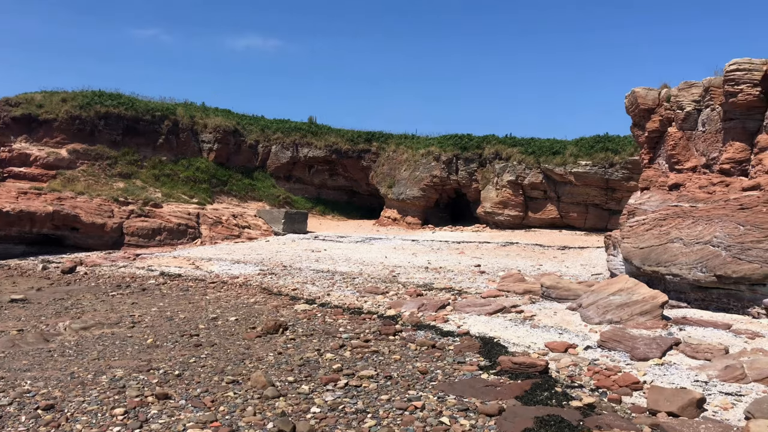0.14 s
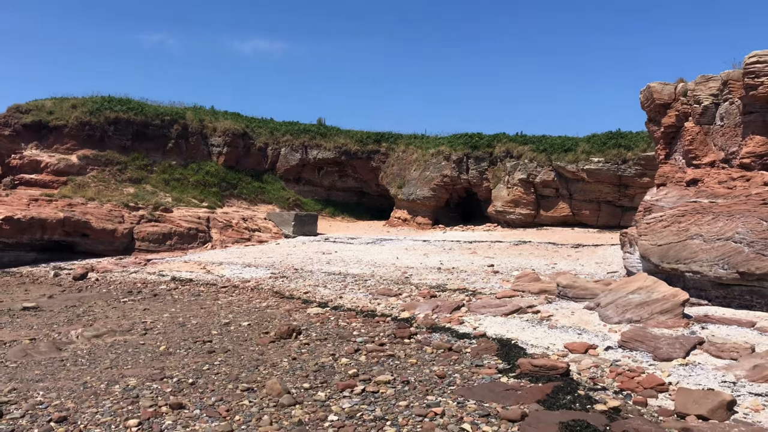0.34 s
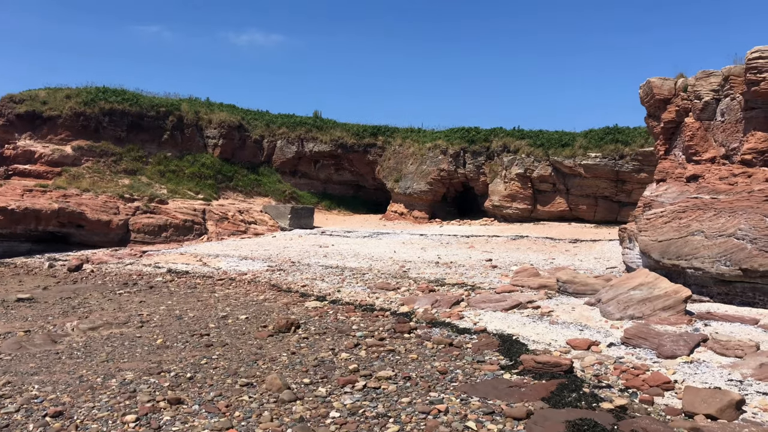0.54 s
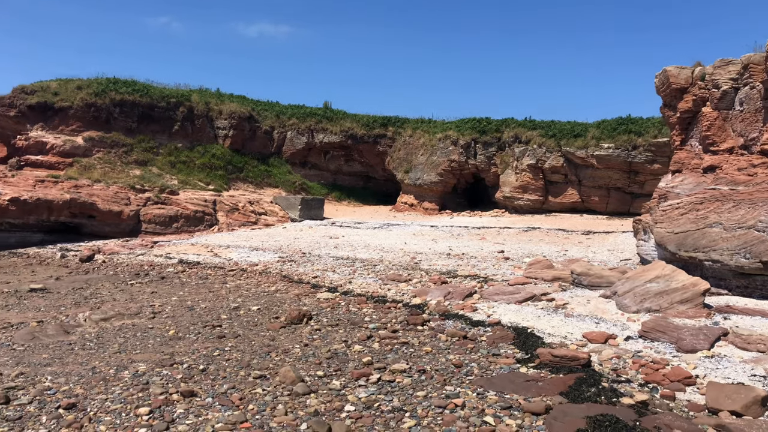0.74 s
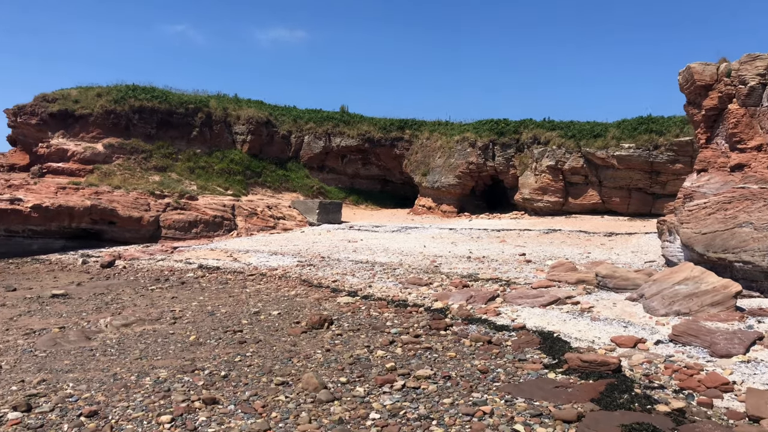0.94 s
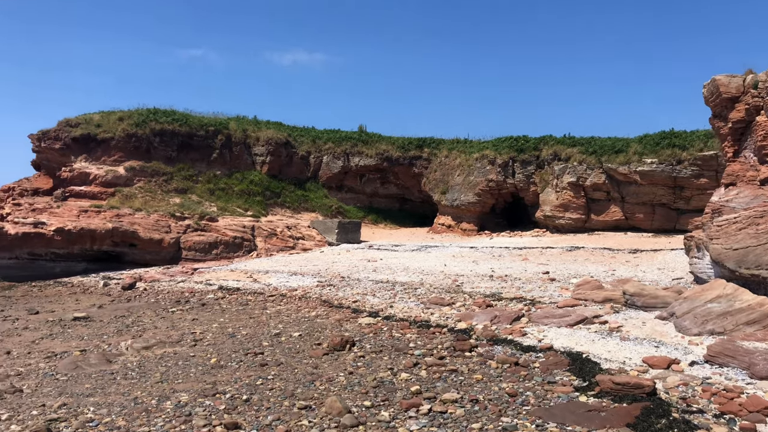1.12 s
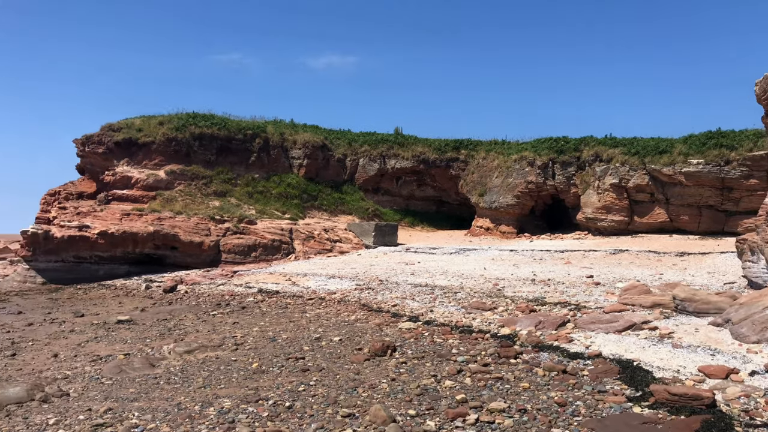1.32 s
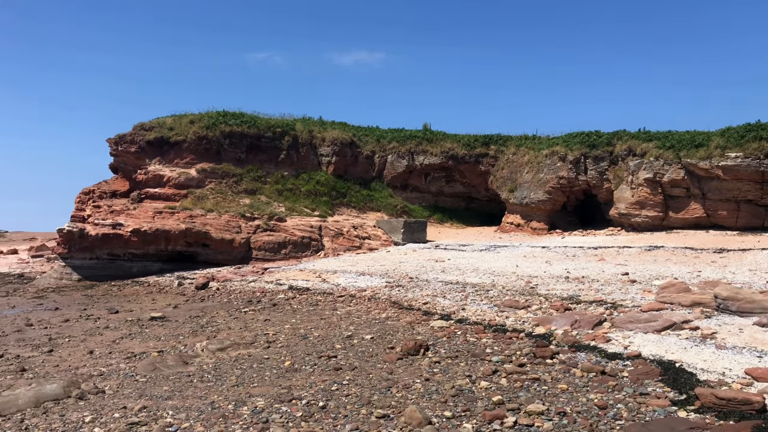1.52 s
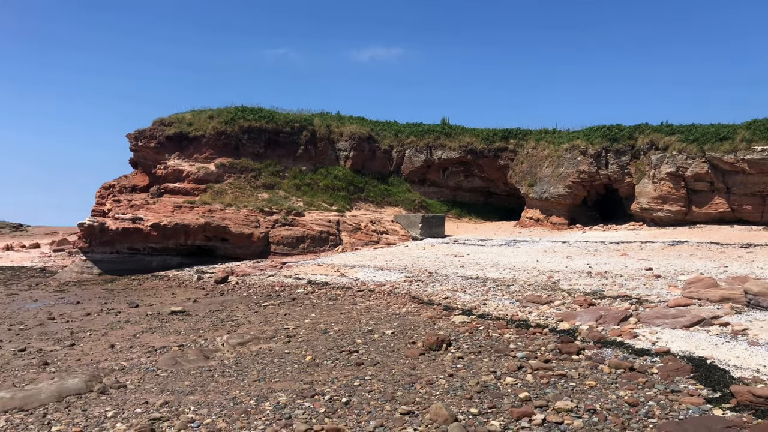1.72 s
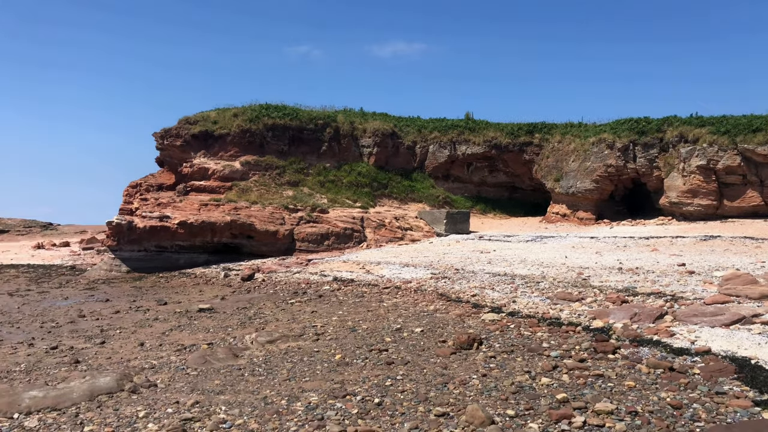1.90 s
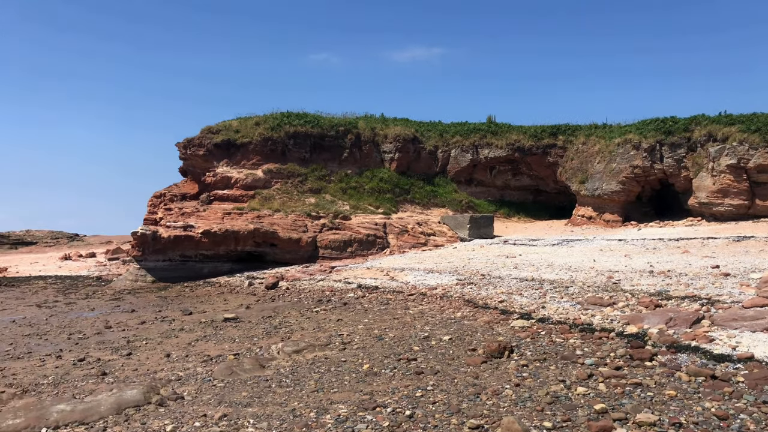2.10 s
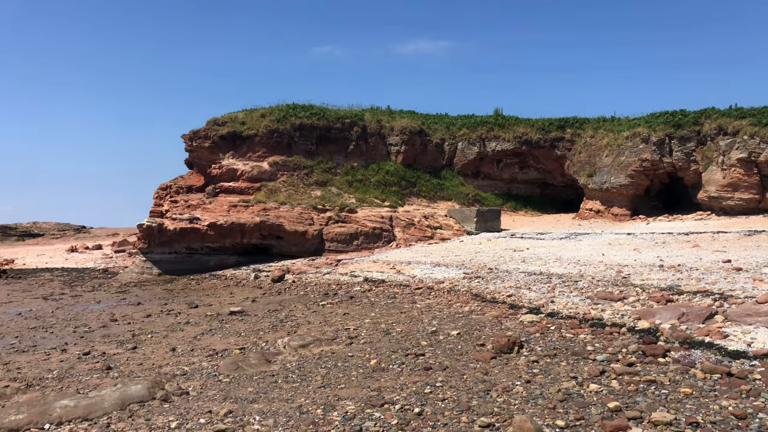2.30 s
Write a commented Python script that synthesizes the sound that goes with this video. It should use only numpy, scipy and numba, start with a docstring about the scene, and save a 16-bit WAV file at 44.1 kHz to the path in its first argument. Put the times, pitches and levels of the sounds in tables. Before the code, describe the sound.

Footsteps crunch over loose pebbles on an open shore. Stones grind from the start; dull thumps cluster at 0.2-0.3 s and 0.5 s, with a small clink near 0.4 s. A bright clink at 1.1 s leads into dense clacking until 1.4 s. A hard thump and loud crunch hit at 1.7 s, then grit settles softly to the end. Breeze rumbles on the handheld microphone over faint shore hiss.

```python
"""Someone walks over a pebble shore in the open air, microphone in hand; the sound is mono.
Throughout, shifts of weight crunch stones, gravel and grit (dense damped sines in three swelling bands),
over a breeze rumbling on the microphone and a faint hiss from the shore (both coloured noise).
From 0.2 s dull thumps (sagging sines) and dry clacks (noise bursts) join in, the hardest thump near 0.3 s.
Pebbles clink (decaying modes) near 0.4, 1.1 and 1.7 s, the last with a hard thump and a loud crunch."""
import sys
import numpy as np
from scipy import signal
from scipy.fft import rfft, irfft
from scipy.io import wavfile
from scipy.ndimage import uniform_filter1d
from numba import njit

SR = 44100
rng = np.random.default_rng(int(sys.argv[2]) if len(sys.argv) > 2 else 0)


def bounce(signal):
    """Save signal as a 16-bit WAV file at the path given by the first command-line argument."""
    frames = np.transpose(np.atleast_2d(signal))
    limited = np.clip(frames, -1, 1)
    pcm = np.round(limited * 32767).astype(np.int16)
    wavfile.write(sys.argv[1], SR, pcm)


N = 103635
T = np.arange(N) / SR
FREQS = np.maximum(np.fft.rfftfreq(N, 1 / SR), 1)
TOP_HZ = 14400  # highest contact pitch, and the recorder's upper limit

# spectrum of crushed stone: (frequency [Hz], gain [dB])
STONE_COLOUR = [(250, 19), (600, 12), (1000, 8), (1330, 8.5), (1900, 6.5), (2700, -0.5), (3800, 0),
                (5500, -8.5), (7500, -24.5), (9300, -31), (10800, -36.5), (14500, -35.5)]


def undb(db):
    """Decibels to gain."""
    return 10 ** (np.asarray(db) / 20)


def unit(x):
    """Scale to rms 1."""
    return x / np.sqrt(np.mean(x ** 2))


def colour(x, points):
    """Shape a spectrum by (Hz, dB) points, interpolated over log frequency; rms 1."""
    hz, db = np.array(points).T
    gain = undb(np.interp(np.log(FREQS), np.log(hz), db))
    return unit(irfft(rfft(x) * gain, N))


def add(out, start_s, x):
    """Mix a short sound in at its time."""
    i = max(int(start_s * SR), 0)
    out[i:i + len(x)] += x[:max(N - i, 0)]


def crunch():
    """Each shift of weight swells and dies away, moving stones, gravel and grit in its own proportions."""
    # shifts of weight: (peak time [s], rise [s], decay [s], stones [dB], gravel [dB], grit [dB])
    shifts = [(.015, 0.011, 0.16, -64.5, -66.5, -66), (.128, 0.016, 0.05, -55.5, -61, -85),
              (.158, 0.033, 0.067, -53.5, -59, -59), (.28, 0.11, 0.58, -61.5, -66.5, -68),
              (0.41, 0.0075, 0.012, -48.5, -67, -63), (.65, 0.071, 0.087, -61.5, -78, -71),
              (0.778, 0.012, 0.046, -62.5, -65.5, -67), (0.994, 0.0033, 0.097, -56, -59, -63.5),
              (1.119, 0.035, 0.13, -54.5, -57.5, -60), (1.12, 0.01, 0.0037, -69, -51.5, -56),
              (1.241, 0.026, 0.036, -49, -55.5, -62.5), (1.336, 0.023, 0.027, -52, -59, -86),
              (1.383, 0.0047, 0.013, -52.5, -58, -61), (1.45, 0.067, 0.17, -60.5, -65.5, -73.5),
              (1.582, 0.011, 0.058, -57.5, -67.5, -69.5), (1.694, 0.0032, 0.029, -44, -55, -54.5),
              (1.716, 0.013, 0.014, -48, -54.5, -54), (1.84, 0.14, 0.33, -59.5, -69.5, -72.5),
              (1.97, 0.16, 0.27, -69, -64, -72), (2.085, 0.026, 0.035, -62.5, -69, -62),
              (2.137, 0.047, 0.017, -60, -59, -86.5)]
    stones_top_hz, gravel_top_hz = 2210, 6790
    loose_db = -10  # ringing pebbles against dead contacts
    dead = contacts(per_s=4000, cycles=1.24, spread_db=0.5, top_hz=TOP_HZ, count=4)
    loose = contacts(per_s=1100, cycles=15, spread_db=2.5, top_hz=7500, count=2)
    stream = bed(dead + undb(loose_db) * loose)
    bands = [(stones_top_hz, "low"), ([stones_top_hz, gravel_top_hz], "band"), (gravel_top_hz, "high")]
    out = 0
    for k, (edges, kind) in enumerate(bands):
        band_filter = signal.butter(4, edges, kind, fs=SR, output="sos")
        grains = signal.sosfiltfilt(band_filter, stream)
        grains = grains / np.sqrt(uniform_filter1d(grains ** 2, size=1500))  # even level over 34 ms
        power = 0
        for peak_s, rise_s, decay_s, *db in shifts:
            before_s, after_s = np.minimum(T - peak_s, 0), np.maximum(T - peak_s, 0)
            swell = np.exp(-(before_s / rise_s) ** 2 / 2 - after_s / decay_s)
            power = power + (undb(db[k]) * swell) ** 2
        out = out + grains * np.sqrt(power)
    return out


def contacts(per_s, cycles, spread_db, top_hz, count):
    """A stream of tiny stone contacts, each ringing at a few (count) pitches of its own."""
    size = per_s * N // SR
    starts = np.repeat(rng.uniform(0, N, size), count)  # samples
    excess_db = spread_db * np.minimum(rng.exponential(size=size), 4)
    strength = np.repeat(undb(excess_db), count)
    hz = 400 * (top_hz / 400) ** rng.random(size * count)
    sizes = strength * hz ** 1.5 * rng.uniform(-1, 1, size * count)
    return colour(rings(starts, hz, sizes, float(cycles)), STONE_COLOUR)


@njit
def rings(starts, hz, sizes, cycles):
    """A damped sine for each contact, falling by 1 / e in the given cycles."""
    out = np.zeros(N)
    for k in range(len(hz)):
        z = sizes[k] + 0j
        step = np.exp((2j * np.pi - 1 / cycles) * hz[k] / SR)
        stop = min(N, int(starts[k] + 6 * cycles * SR / hz[k]))
        for i in range(int(starts[k]), stop):
            z *= step
            out[i] += z.imag
    return out


def bed(x):
    """The heap of stones favours some pitches and swallows others: random gain over frequency."""
    ripple_db, spacing_hz = 2.5, 69.72
    ripple = np.interp(FREQS / spacing_hz, np.arange(1024), rng.standard_normal(1024))
    return irfft(rfft(x) * undb(ripple_db * ripple), N)


def jerks():
    """Stones stick and give way: a stepped gain makes uneven spurts a few milliseconds long."""
    jerks_per_s, jerk_db = 220, 2.0
    spurt = np.cumsum(rng.random(N) < jerks_per_s / SR)  # index of the current spurt
    strength = undb(jerk_db * np.clip(rng.standard_normal(N), -2, 2))
    return unit(uniform_filter1d(strength[spurt], size=32))


def thumps():
    """Soft, heavily damped blows: a few cycles that sag in pitch, roughened by scuffing."""
    # dull thumps: (time [s], starting pitch [Hz], level [dB])
    blows = [(0.2265, 390, -28.5), (0.2418, 923, -32.5), (0.2443, 272, -31), (0.247, 905, -24),
             (0.2557, 830, -25.5), (0.3077, 820, -17.5), (0.5112, 365, -28.5), (0.5213, 615, -21),
             (0.524, 239, -25.5), (.609, 710, -35), (.635, 435, -34), (.654, 590, -31.5), (.680, 422, -35),
             (.714, 380, -41.5), (0.797, 453, -36), (0.81, 360, -33), (0.823, 943, -37), (.830, 586, -31.5),
             (0.833, 201, -34), (.994, 765, -37), (1.008, 460, -33), (1.0174, 174, -31.5),
             (1.042, 750, -38.5), (1.125, 760, -32.5), (1.258, 605, -37.5), (1.31, 560, -36.5),
             (1.339, 360, -40), (1.539, 770, -42), (1.578, 487, -37), (1.599, 454, -37.5),
             (1.6906, 950, -20), (1.6991, 644, -28.5), (1.782, 845, -43), (2.072, 178, -41.5),
             (2.231, 590, -42.5)]
    rise_cycles, swell_power = 2.95, 3.1
    sag, sag_cycles = 0.865, 2.9  # share of pitch lost, and its time constant
    scuff_gain = 0.16
    out, t = np.zeros(N), T[:SR // 8]
    for start_s, hz, db in blows:
        age = t * hz / rise_cycles
        swell = age * np.exp(1 - age)
        pitch_hz = hz * (1 - sag * (1 - np.exp(-t * hz / sag_cycles)))
        tone = np.sin(2 * np.pi * np.cumsum(pitch_hz) / SR)
        scuff_filter = signal.butter(3, [hz / 10, hz / 2], "band", fs=SR, output="sos")
        scuff = unit(signal.sosfilt(scuff_filter, rng.standard_normal(len(t))))
        blow = swell ** swell_power * tone + scuff_gain * swell ** 2 * scuff
        add(out, start_s, undb(db) * blow)
    return out


def clacks(size=1024):
    """Dry cracks a few milliseconds long, pitched by the size of the stone, with a broad crackle of grit."""
    # stone against stone, dull clacks to tiny ticks: (time [s], centre [Hz], level [dB])
    knocks = [(0.162, 7350, -43), (0.322, 1070, -48), (.355, 5070, -50), (0.562, 890, -52.5),
              (0.588, 2700, -54.5), (0.6657, 7500, -47.5), (0.6936, 7400, -47), (0.7206, 8700, -52),
              (0.778, 1080, -54), (0.828, 5970, -53), (0.991, 7200, -53), (1.1164, 5500, -38.5),
              (1.128, 3600, -41), (1.184, 1520, -51), (1.211, 3680, -54), (1.222, 3870, -43.5),
              (1.235, 1410, -48.5), (1.254, 4000, -47.5), (1.262, 1270, -42.5), (1.284, 1370, -48.5),
              (1.308, 1230, -47), (1.335, 3860, -48.5), (1.342, 1310, -50), (1.38, 3280, -51),
              (1.539, 5500, -47.5), (1.823, 3000, -52), (1.847, 2420, -57), (1.921, 2900, -50),
              (1.976, 6060, -59), (2.010, 2540, -51), (2.142, 3500, -58)]
    width_oct, decay_at_3khz_s = 0.36, 0.003  # smaller stones die sooner
    grit_db = -5.5  # against the pitched band
    out, t = np.zeros(N), T[:size]
    freqs = np.maximum(np.fft.rfftfreq(size, 1 / SR), 1)
    grit = unit(undb(np.interp(freqs, *np.array(STONE_COLOUR).T)) * np.sqrt(freqs))
    for start_s, hz, db in knocks:
        band = 1 / (1 + (np.log2(freqs / hz) / width_oct) ** 2)
        band = band / np.sqrt(1 + (freqs / 10000) ** 12)  # steep fall above 10 kHz
        spectrum = np.hypot(unit(band), undb(grit_db) * grit)
        crack = unit(irfft(rfft(rng.standard_normal(size)) * spectrum))
        decay_s = decay_at_3khz_s * np.sqrt(3000 / hz)
        add(out, start_s, undb(db) * crack * np.exp(-t / decay_s))
    return out


def clinks():
    """Hard pebbles ring briefly when knocked: a sum of inharmonic modes decaying together."""
    # ringing pebbles: (time [s], pitch [Hz], level [dB])
    knocks = [(.368, 5980, -44), (1.106, 5140, -40), (1.1164, 5140, -32), (1.129, 4695, -39),
              (1.694, 2167, -40), (1.695, 2460, -38)]
    # modes of a pebble: (ratio to its pitch [1], level [dB])
    modes = [(0.71, -13), (0.997, 0.5), (1.1, -15), (1.33, -23)]
    t60_s, rise_s = 0.028, 0.0012
    out, t = np.zeros(N), T[:SR // 8]
    envelope = (1 - np.exp(-t / rise_s)) * np.exp(-np.log(1000) * t / t60_s)
    for start_s, hz, db in knocks:
        ring = sum(undb(mode_db) * np.sin(2 * np.pi * hz * ratio * t) for ratio, mode_db in modes)
        add(out, start_s, undb(db) * ring * envelope)
    return out


def air():
    """The breeze rumbles on the microphone over a faint, even hiss from the shore: coloured noise."""
    # rumble spectrum: (frequency [Hz], gain [dB])
    wind_colour = [(20, -20), (35, -8), (58, 2), (90, -1.5), (140, -6), (250, -15.5), (450, -24.5),
                   (900, -39), (5000, -84)]
    # breeze on the microphone: (time [s], level [dB])
    breeze = [(0, -62), (.13, -57), (.2, -43), (.33, -42), (.4, -52.5), (.48, -48.5), (.67, -46),
              (.76, -53), (.83, -45), (.89, -61.5), (.94, -51), (1.14, -44.5), (1.22, -56.5), (1.35, -47),
              (1.44, -55.5), (1.64, -46.5), (1.8, -55.5), (2.13, -48.5), (2.35, -53.5)]
    # distant hiss spectrum: (frequency [Hz], gain [dB])
    shore_colour = [(100, -5.5), (500, -5.5), (1000, -9), (2500, -18.5), (5500, -23.5), (8000, -23),
                    (10500, -23), (14000, -31)]
    shore_db = -70
    rumble = colour(rng.standard_normal(N), wind_colour)
    rumble = rumble / np.sqrt(uniform_filter1d(rumble ** 2, size=3000))  # even level over 68 ms
    gusts = rumble * undb(np.interp(T, *np.array(breeze).T))
    hiss = undb(shore_db) * colour(rng.standard_normal(N), shore_colour)
    return gusts + hiss


def scene():
    """All sources, the same in both channels."""
    mono = crunch() * jerks() + thumps() + clacks() + clinks() + air()
    return np.array([mono, mono])


def record(dry):
    """The recorder drops the deepest rumble and cuts the top steeply."""
    low_cut_hz = 33
    lean = irfft(rfft(dry) / np.sqrt(1 + (low_cut_hz / FREQS) ** 10), N)
    top_cut = signal.ellip(10, .2, 70, TOP_HZ, fs=SR, output="sos")
    return signal.sosfilt(top_cut, lean)


dry = scene()
out = record(dry)
bounce(out)
```